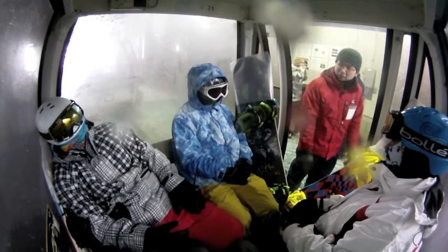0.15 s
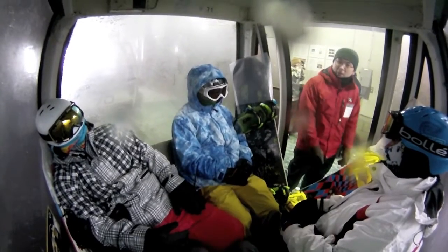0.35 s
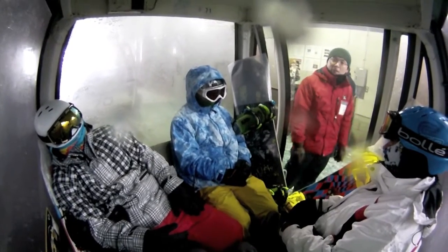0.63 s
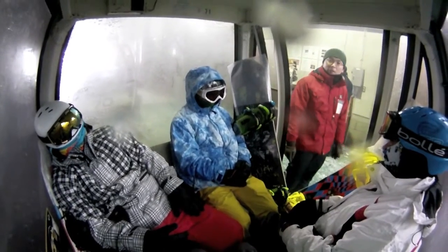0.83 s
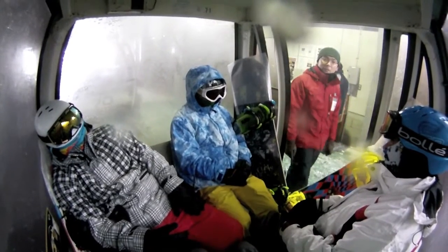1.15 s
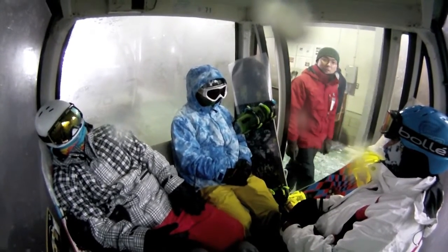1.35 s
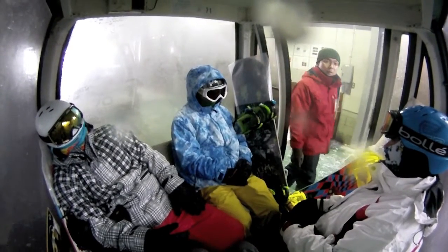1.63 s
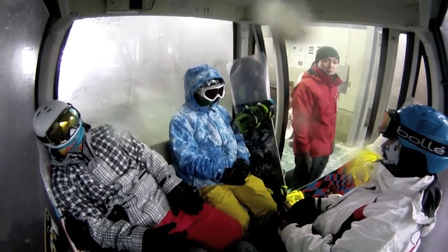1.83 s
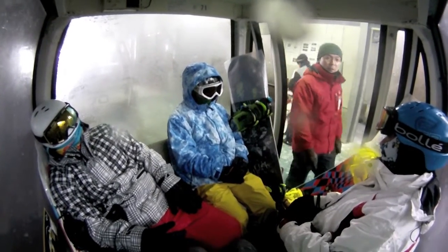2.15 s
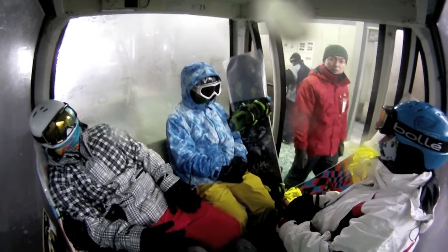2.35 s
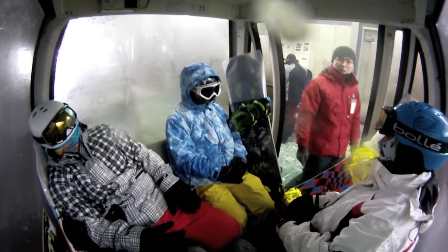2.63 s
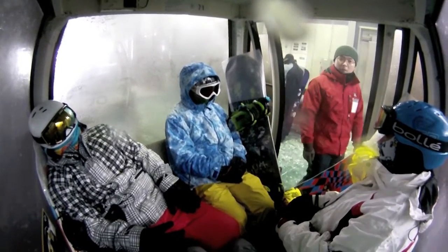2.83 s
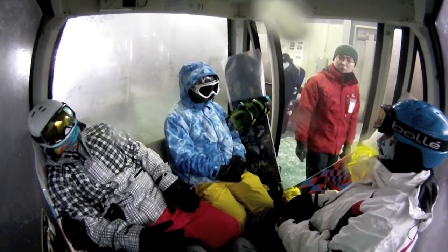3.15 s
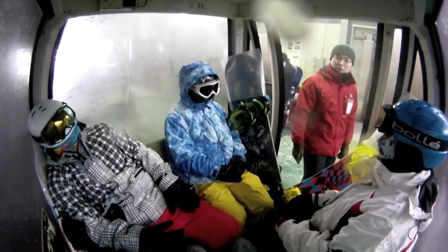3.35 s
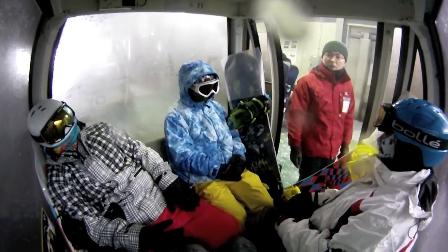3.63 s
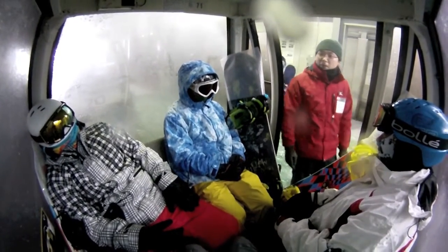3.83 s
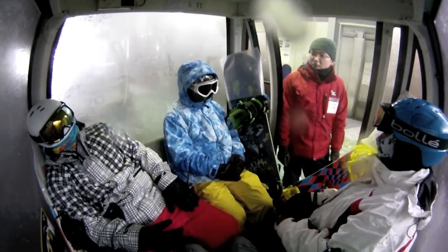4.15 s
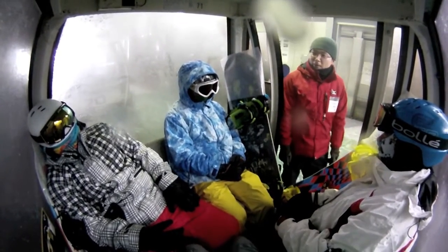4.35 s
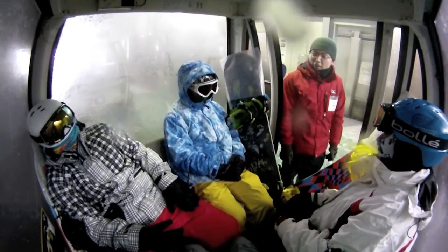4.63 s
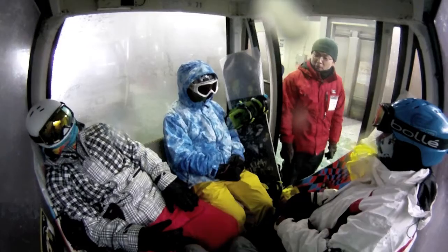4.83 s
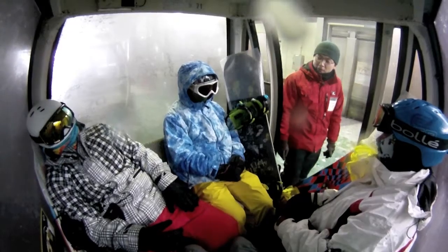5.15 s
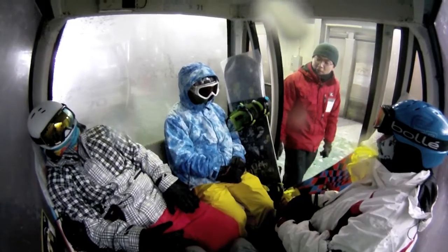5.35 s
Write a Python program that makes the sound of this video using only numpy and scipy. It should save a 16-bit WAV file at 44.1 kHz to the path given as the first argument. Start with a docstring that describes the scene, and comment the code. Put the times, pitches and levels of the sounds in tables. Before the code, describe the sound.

A deep wavering motor drone and rolling tyre noise fill a cable-car cabin, broken by muffled thuds, faint gear taps and a late jacket rustle.

```python
"""Inside a closed gondola cabin that creeps through the lift station, heard by one small camera microphone.
The drive hums with an octave and overtones; the cabin shudders on its hanger as a wandering low tone and rumble.
Conveyor tyres roll as coloured noise through the shell and panels, and chafe in one narrow resonance.
Filtered pushes knock on the shell, struck modes make ticks, a jolt's rattle and a zip pull, and nylon swishes.
The camera's coarse sample clock holds each value, leaving a faint mirrored treble."""
import sys
import numpy as np
from scipy import signal
from scipy.fft import rfft, irfft, next_fast_len
from scipy.io import wavfile
from scipy.ndimage import map_coordinates

SR = 44100
rng = np.random.default_rng(int(sys.argv[2]) if len(sys.argv) > 2 else 0)


def waveform_to_disk(signal):
    """Save audio, clipped to [-1, 1], as 16-bit WAV at the path in sys.argv[1]."""
    frames = np.transpose(np.atleast_2d(signal))
    scaled = np.clip(frames, -1, 1) * 32767
    samples = np.round(scaled).astype(np.int16)
    wavfile.write(sys.argv[1], SR, samples)


N = 242329
T = np.arange(N) / SR   # time [s]
JOLT_S, JOLT_LENGTH_S = 2.875, 0.17   # start and length of the jolt [s]
# what a tapped panel rings with: (frequency [Hz], level before tilt and scatter [dB], t60 [s])
PANEL_MODES = [(815, -5, 0.016), (1080, -1, 0.022), (1240, -5, 0.015), (1530, -5.5, 0.019),
               (1730, -13, 0.018), (2348, -12.5, 0.025), (3680, -22, 0.02)]


def drive(octave_trim_db=-1.0, octave_waver_db=1.5, waver_db=2.0):
    """The motor's hum and its octave swell and sink, each in its own time; octave and weaker overtones waver."""
    # speed of the drive: (time [s], pitch of the hum [Hz])
    speed = [(0, 72.2), (0.5, 72.7), (1.0, 73.5), (2.6, 73.39), (3.4, 72.6), (4.2, 74.23), (5.49, 73.27)]
    # the hum swells and sinks: (time [s], rms level [dB])
    hum_level = [(0.0, -53), (0.14, -31.8), (0.6, -32), (0.73, -53), (0.83, -38.4), (1.58, -33),
                 (1.67, -43), (2.08, -33.5), (2.17, -51), (2.27, -29.5), (2.77, -43.5), (2.89, -31.5),
                 (3.11, -34.0), (3.19, -44), (3.47, -34), (3.61, -44.6), (3.73, -39.5), (3.85, -47.5),
                 (4.0, -36.9), (4.12, -48), (4.3, -36), (4.45, -44.5), (4.73, -31.5), (4.9, -38.5),
                 (5.37, -30), (5.49, -40)]
    # the hum's octave: (time [s], rms level before trim and wavering [dB])
    octave_level = [(0.0, -42), (0.23, -41), (1.35, -42), (1.6, -40.5), (1.74, -46), (2.12, -39.5),
                    (2.17, -44.2), (2.66, -40.5), (2.75, -32), (2.85, -47.5), (4.14, -39.6), (4.19, -53),
                    (4.29, -40), (4.35, -48.3), (4.77, -40), (4.9, -48.3), (5.04, -43), (5.37, -48),
                    (5.44, -41), (5.49, -32)]
    # weaker overtones: (multiple of the hum's pitch, rms level before wavering [dB])
    overtones = [(3, -53), (5, -63.5)]
    pitch, = in_time(speed)
    hum_db, = in_time(hum_level)
    octave_db, = in_time(octave_level)
    octave_db = octave_db + octave_trim_db + octave_waver_db * drift(4.7)
    out = from_db(hum_db) * tone(pitch) + from_db(octave_db) * tone(2 * pitch)
    for multiple, db in overtones:
        out = out + from_db(db + waver_db * drift(4.5)) * tone(round(multiple) * pitch)
    return out


def shudder(rumble_db=-13.0, rest_db=-45.0, uneven_db=1.27, wander_hz=0.592):
    """The whole cabin shakes at its lowest resonance; the harder it shakes, the more its frame rumbles."""
    # how hard the cabin shakes on its hanger: (time [s], rms level before unevenness [dB])
    strength = [(0.0, -40.5), (0.14, -29.5), (0.93, -31), (1.13, -25), (1.72, -44), (2.47, -26.5),
                (2.62, -45), (2.69, -28.1), (3.02, -17.5), (3.14, -29), (3.28, -19), (3.84, -27.3),
                (3.95, -21.5), (4.23, -31.5), (4.53, -22.5), (4.71, -30.5), (4.86, -23.5), (5.37, -22),
                (5.49, -29)]
    # how fast it shakes: (time [s], rate before wander [Hz])
    shake_rate = [(0, 19.6), (1.4, 18), (2.4, 20.3), (4.5, 21), (4.9, 18.5), (5.49, 18)]
    # colour of the frame's rumble: (frequency [Hz], relative level [dB per Hz])
    rumble_colour = [(22, 2), (34, 9), (44, -3.5), (55, -5), (75, -13.5), (97, -5), (125, -19), (170, -11),
                     (300, -45)]
    db, = in_time(strength)
    hz, = in_time(shake_rate)
    db = db + uneven_db * drift(5.2)
    # rumble_db is set against the shake; rest_db remains when the cabin hangs still
    rumble = np.hypot(from_db(db + rumble_db), from_db(rest_db)) * noise(rumble_colour)
    shake = from_db(db) * tone(hz + wander_hz * drift(3.76))
    return shake + rumble


def knocks(low_hz=75, high_hz=275, size=8192):
    """Each dull push bounces between the walls a few times; the soft contact leaves no treble."""
    # soft knocks on the shell: (time [s], peak level [dB], length of the push [s])
    pushes = [(0.313, -12, 0.0033), (0.992, -13, 0.004), (1.183, -14.5, 0.0044), (1.207, -23, 0.0027),
              (2.889, -19.5, 0.0031), (2.909, -20.5, 0.0036), (2.946, -29, 0.002), (2.995, -24, 0.0016)]
    crossing_s, wall_echo = 0.00792, 0.45   # round trip between the walls [s], share that returns
    out, t = np.zeros(N), T[:size]
    for s, db, length in pushes:
        push = sum(wall_echo ** k * swell(k * crossing_s, length, t) for k in range(6))
        dull = cut(push, high_hz, "low", order=10)
        thud = cut(dull, low_hz, "high", order=3)
        add(out, s, from_db(db) * thud / np.abs(thud).max())
    return out


def ticks():
    """Skis and boards tap the panels, which ring for a few milliseconds."""
    # ticks of gear against the cabin: (time [s], peak level [dB], tilt [dB per octave])
    taps = [(0.1625, -34, 2), (0.2445, -34.5, 2), (0.3555, -37, -1), (0.728, -40, -1), (1.0105, -34, 3),
            (1.1015, -37, -1), (1.2085, -28.5, 3), (2.1427, -32.5, -5), (2.361, -32, -2), (2.709, -38, -1),
            (3.2135, -36, 1), (4.850, -38, 3), (5.365, -39, 2)]
    out = np.zeros(N)
    for s, db, tilt_db in taps:
        add(out, s, from_db(db) * strike(PANEL_MODES, tilt_db))
    return out


def rattle(count=30, loudest_db=-42, tilt_db=7.0):
    """The jolt shakes loose fittings against the same panels at uneven moments."""
    out = np.zeros(N)
    # one touch at a random moment in each equal slice of the jolt
    touches = JOLT_S + (np.arange(count) + rng.random(count)) / count * JOLT_LENGTH_S
    for s in touches:
        strength = from_db(loudest_db) * swell(JOLT_S, JOLT_LENGTH_S, s)
        add(out, s, strength * strike(PANEL_MODES, tilt_db, scatter_db=4.0))
    return out


def jacket(grain_db=-1.0, sag=0.035, zip_s=4.919, zip_db=-28.5):
    """Ribbed nylon sings as it slides, lower as the sleeve slows after a zip pull flicks."""
    # strokes of a sleeve over nylon: (time [s], length [s], level at the top before grain [dB])
    swishes = [(0.07, 0.25, -57.5), (4.79, 0.15, -46), (4.93, 0.1, -48)]
    # colour of the rubbed nylon: (frequency [Hz], relative level [dB per Hz])
    nylon = [(1200, -21), (2000, -4), (2500, -6), (2750, 4), (3000, 4.5), (3350, -17), (5500, -28)]
    # ring of the zip pull: (frequency [Hz], level before scatter [dB], t60 [s])
    zip_modes = [(2800, -1, 0.02), (2940, -5, 0.016), (3400, -1, 0.021), (3600, -5, 0.029),
                 (4880, -17, 0.03)]
    speed = 1 - sag * np.clip((T - zip_s) / 0.041, 0, 1)   # share of full speed, falling over 41 ms
    # reading the noise more slowly lowers its pitch
    ribs = map_coordinates(noise(nylon), [np.cumsum(speed) - 1], order=3)
    out = strokes(swishes) * from_db(grain_db * drift(59.8)) * ribs
    add(out, zip_s, from_db(zip_db) * strike(zip_modes))
    return out


def chafe(hz=3520, width=140):
    """Slipping rubber excites one narrow resonance."""
    # a tyre chafes faintly on the grip rail: (time [s], length [s], level at the top [dB])
    slips = [(3.025, 0.053, -56), (3.31, 0.1, -53.5)]
    slip = rng.standard_normal(N)
    ring = resonate(resonate(slip, hz, width), hz, 2 * width)
    return strokes(slips) * rms_one(ring)


def tyres(drone_trim_db=9.0, hiss_trim_db=2.0, flutter_db=0.5, grit_db=0.62, jolt_rise_db=2.0):
    """Rolling noise, louder in the jolt: a shell drone that booms in the cabin's air, and a panelled hiss."""
    # rolling tyres: (time [s], drone level [dB], hiss level [dB]), both before trim, jolt and flutter or grit
    rolling_level = [(0, -51.5, -50.5), (0.65, -52, -51.5), (1.25, -50.5, -50.5), (1.6, -53.5, -52.5),
                     (2.3, -50, -51), (2.8, -51, -51), (3.6, -50, -51.5), (4.1, -50, -50.7),
                     (4.75, -51, -51), (5.05, -52.5, -50.5), (5.49, -49, -51.5)]
    # colour of the shell's drone: (frequency [Hz], relative level [dB per Hz])
    drone_colour = [(60, -1), (95, 8), (130, 4.5), (165, 4.5), (200, -3), (250, 3), (290, -4), (340, -2.5),
                    (400, -7), (490, -6.5), (600, -15), (1000, -48)]
    # colour of the hiss: (frequency [Hz], relative level [dB per Hz])
    hiss_colour = [(250, -23), (500, 3), (700, -1.5), (880, -0.5), (1300, -2), (1900, -1), (2600, -3.5),
                   (3200, -3), (4000, -9), (4800, -7.5), (5500, -12.5), (6000, -12.5)]
    # resonances of the cabin's panels: (frequency [Hz], width [Hz], gain before the hiss is levelled [dB])
    panels = [(779, 40, 2), (1059, 135, 6), (1513, 163, 2), (2275, 140, -3.5), (3548, 145, 3.5)]
    boom_hz, boom_width, boom_db = 253.4, 14, -15.5   # boom of the cabin's air [Hz, Hz, dB against the shell]
    drone_db, hiss_db = in_time(rolling_level) + jolt_rise_db * swell(JOLT_S, JOLT_LENGTH_S)
    shell = noise(drone_colour)
    boom = from_db(boom_db) * rms_one(resonate(noise(drone_colour), boom_hz, boom_width))
    drone = from_db(drone_db + drone_trim_db + flutter_db * drift(9)) * (shell + boom)
    rolling = noise(hiss_colour)
    hiss = noise(hiss_colour)
    for hz, width, db in panels:
        hiss = hiss + from_db(db) * resonate(rolling, hz, width)
    return drone + from_db(hiss_db + hiss_trim_db + grit_db * drift(19)) * rms_one(hiss)


def strike(modes, tilt_db=0.0, scatter_db=1.2, contact_s=0.004, size=4096):
    """Each mode swells over a few milliseconds of contact and rings with a strength of its own; peak 1."""
    t, out = T[:size], np.zeros(size)
    for hz, db, t60 in modes:
        tilt = tilt_db * np.log2(hz / modes[0][0])
        level = db + tilt + scatter_db * rng.standard_normal() - 60 * t / t60
        out += from_db(level) * np.sin(2 * np.pi * (hz * t + rng.random()))
    out = out * np.sin(np.pi / 2 * np.minimum(t / contact_s, 1)) ** 2
    return out / np.abs(out).max()


def swell(start, length, t=T):
    """A smooth rise and fall of height 1."""
    return np.sin(np.pi * np.clip((t - start) / length, 0, 1))


def strokes(rows):
    """Gain of a few rubbing strokes, each gathering speed and slowing again."""
    return sum(from_db(db) * swell(s, length) for s, length, db in rows)


def from_db(db):
    """Decibels to gain."""
    return 10 ** (np.asarray(db) / 20)


def rms_one(x):
    """Scale to rms 1."""
    return x / np.sqrt(np.mean(x ** 2) + 1e-20)


def in_time(rows):
    """Each column of a curve at every sample."""
    s, *columns = np.transpose(rows)
    return [np.interp(T, s, c) for c in columns]


def drift(rate):
    """Random wander of rms 1: noise through two equal poles at rate [Hz]."""
    step = 40   # samples between slow values
    r = np.exp(-2 * np.pi * rate * step / SR)
    chance = rng.standard_normal(N // step + 2002)
    slow = signal.lfilter([1], [1, -2 * r, r * r], chance)[2000:]   # drop the filter's start-up
    return np.interp(np.arange(N) / step, np.arange(len(slow)), rms_one(slow))


def noise(spectrum):
    """Noise of rms 1 with the given colour, falling 24 dB per octave beyond its ends."""
    hz, db = np.transpose(spectrum)
    size = next_fast_len(N)
    octave = np.log2(np.fft.rfftfreq(size, 1 / SR) + 1e-3)
    beyond = np.abs(octave - np.clip(octave, np.log2(hz[0]), np.log2(hz[-1])))
    gain = from_db(np.interp(octave, np.log2(hz), db) - 24 * beyond)
    return rms_one(irfft(rfft(rng.standard_normal(size)) * gain, size)[:N])


def cut(x, hz, kind, order=2):
    """Butterworth filter."""
    sos = signal.butter(order, hz, kind, fs=SR, output="sos")
    return signal.sosfilt(sos, x + 1e-18)


def resonate(x, hz, width):
    """One resonance with gain 1 on top, its width in Hz."""
    r = np.exp(-np.pi * width / SR)
    zeros = np.array([1, 0, -1]) * (1 - r * r) / 2
    poles = [1, -2 * r * np.cos(2 * np.pi * hz / SR), r * r]
    return signal.lfilter(zeros, poles, x + 1e-18)


def tone(hz):
    """A sine of rms 1 that follows a pitch curve."""
    return np.sqrt(2) * np.sin(2 * np.pi * (np.cumsum(hz) / SR + rng.random()))


def add(out, s, sound):
    """Mix a sound in at time s."""
    at = round(s * SR)
    out[at:at + len(sound)] += sound[:N - at]


def scene():
    """Everything meets at one microphone in the cabin."""
    machinery = drive() + shudder() + tyres() + chafe()
    return (machinery + knocks() + ticks() + rattle() + jacket())[None]


def record(dry, clock_hz=12000, cutoff_hz=15300):
    """Each sample of the slow clock is held for four steps, which mirrors the sound faintly into the treble."""
    dull = cut(dry, 5650, "low", order=12)
    coarse = signal.resample_poly(dull, clock_hz, SR, axis=1)
    steps = np.repeat(coarse, 4, axis=1)
    held = signal.resample_poly(steps, SR, 4 * clock_hz, axis=1)[:, :N]
    lowpass = signal.ellip(12, 0.1, 80, cutoff_hz, fs=SR, output="sos")
    return signal.sosfilt(lowpass, held)


dry = scene()
out = record(dry)
waveform_to_disk(out)
```